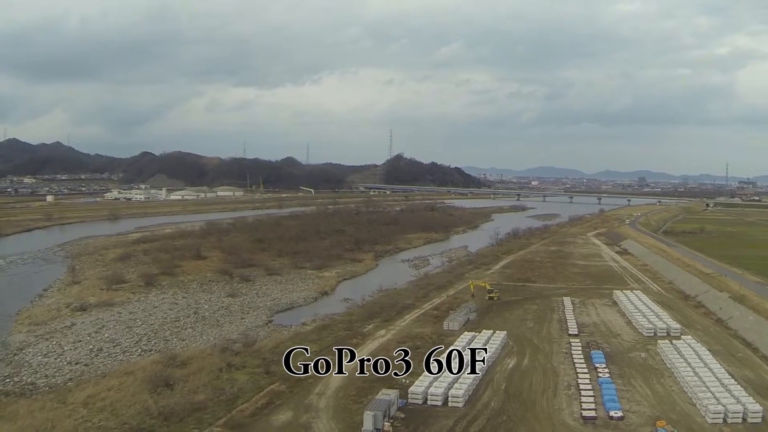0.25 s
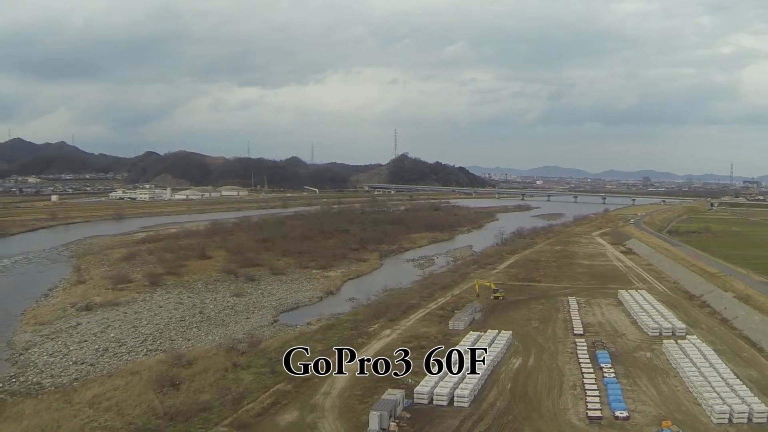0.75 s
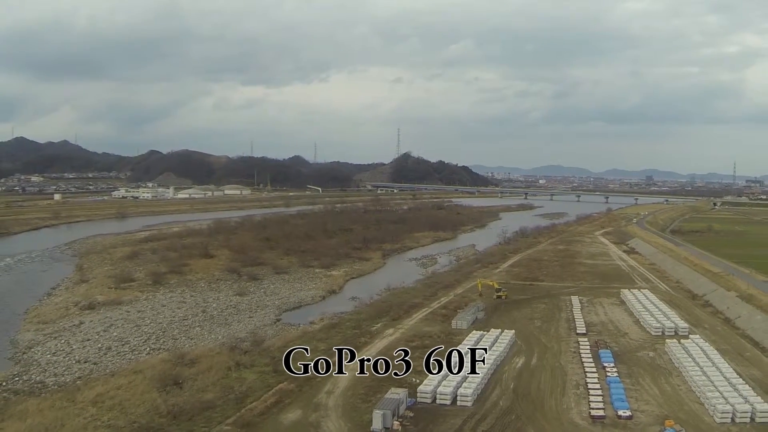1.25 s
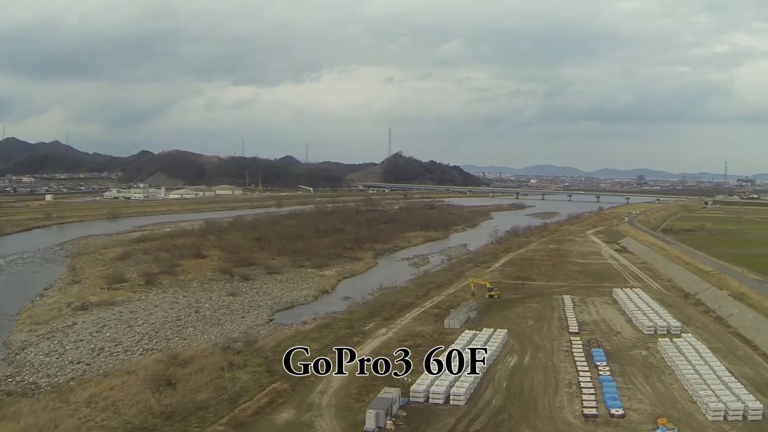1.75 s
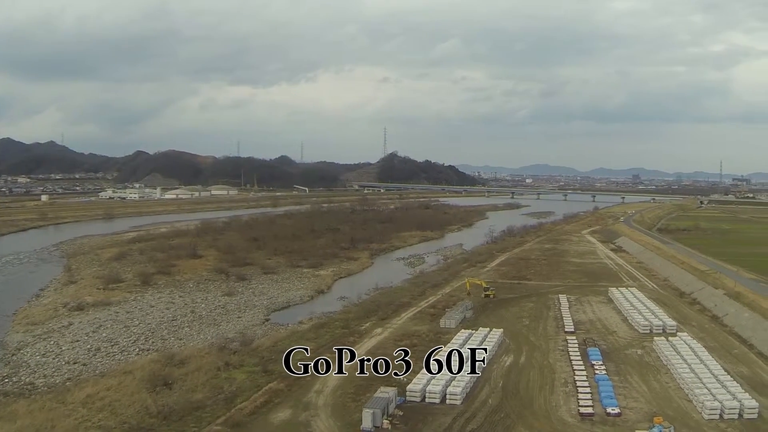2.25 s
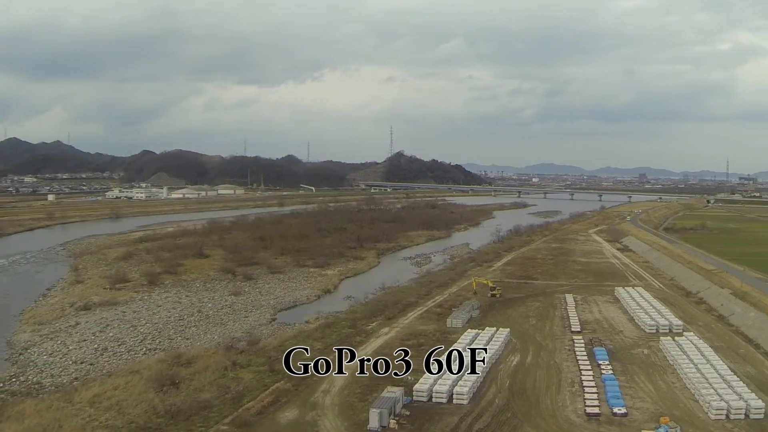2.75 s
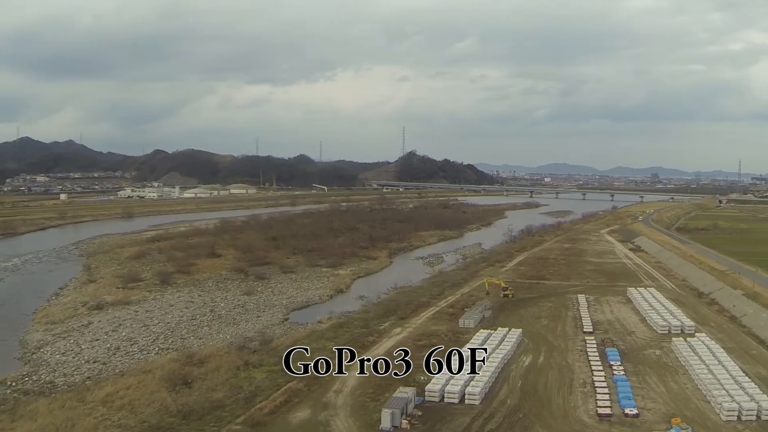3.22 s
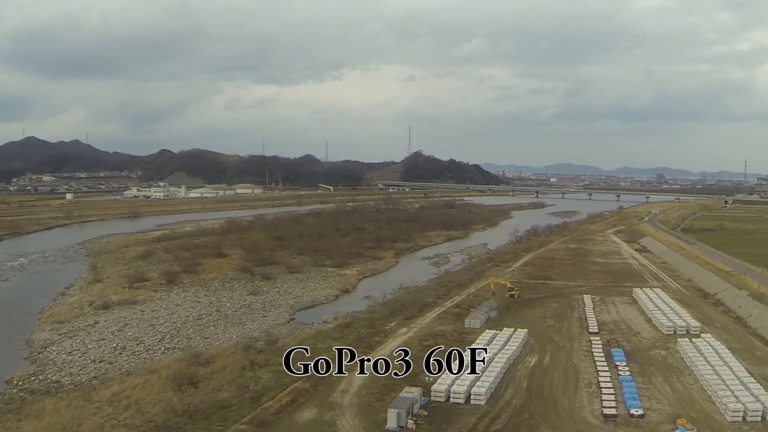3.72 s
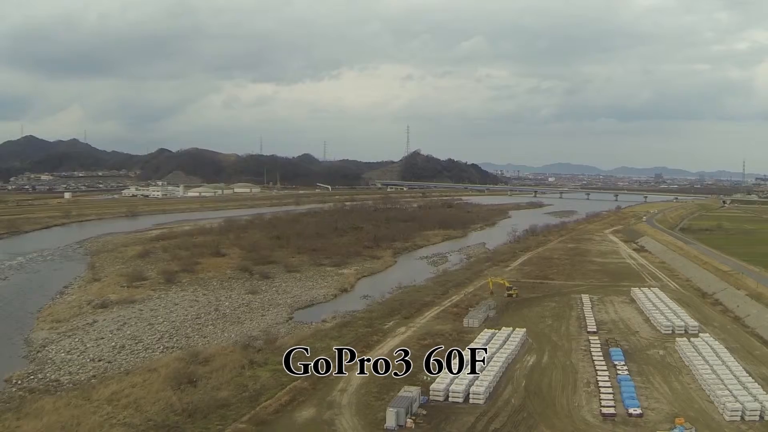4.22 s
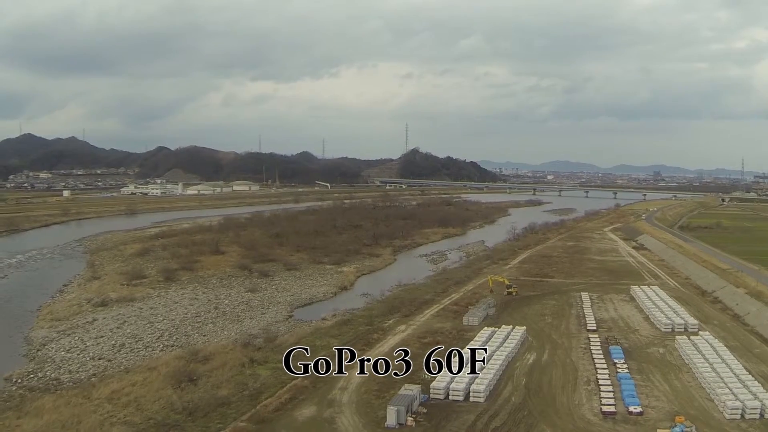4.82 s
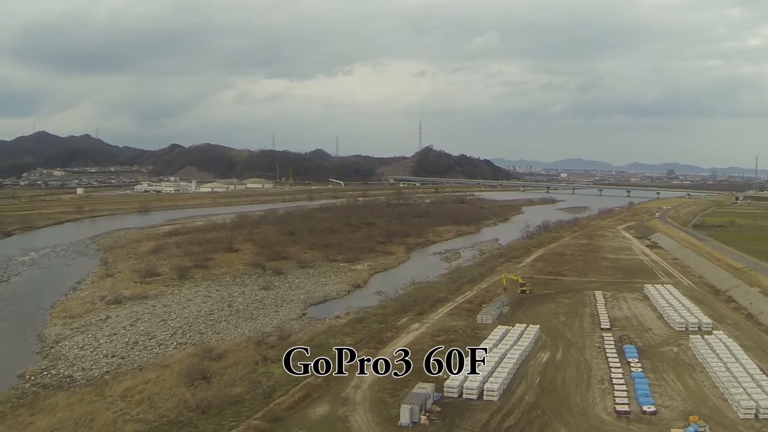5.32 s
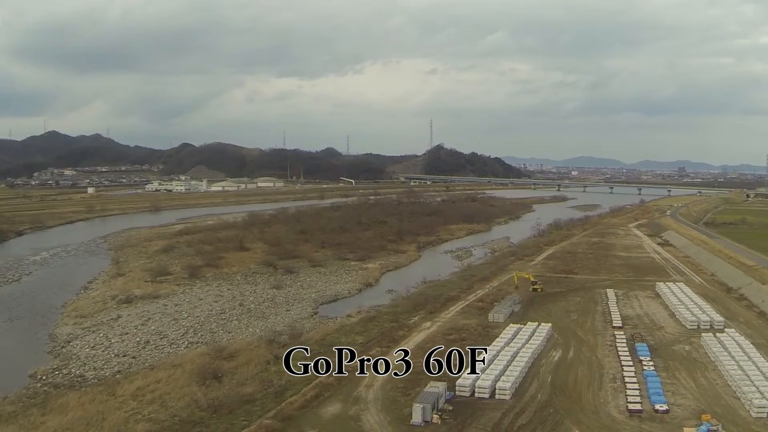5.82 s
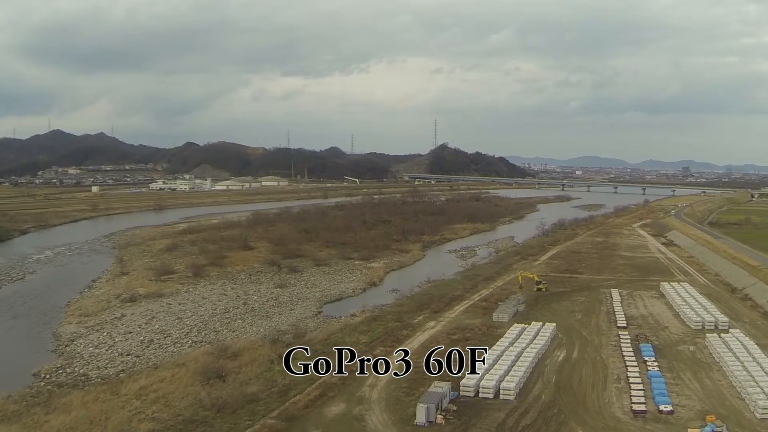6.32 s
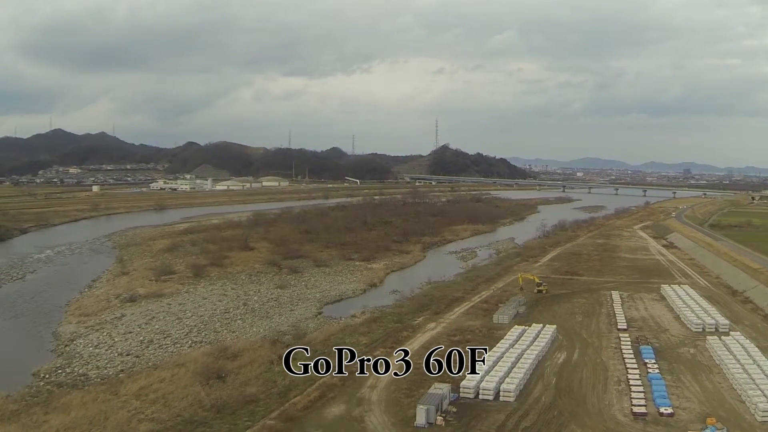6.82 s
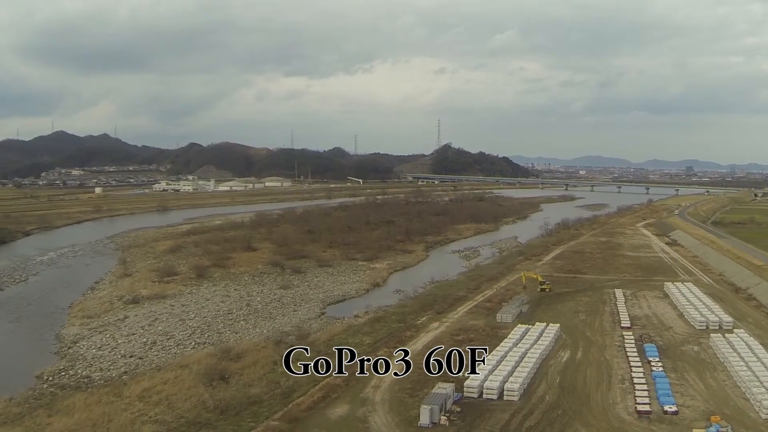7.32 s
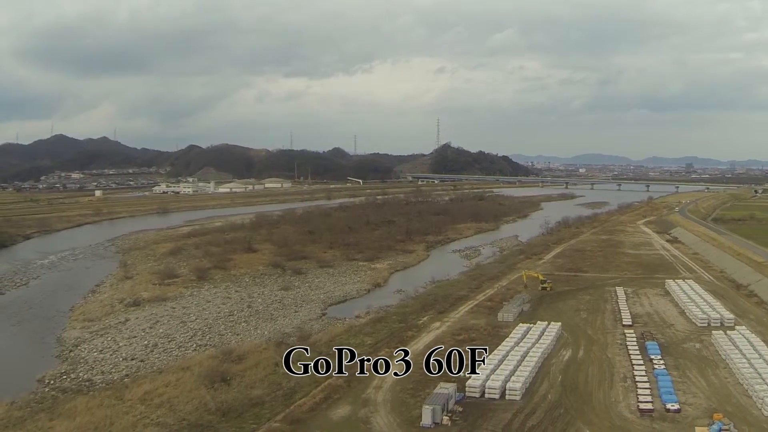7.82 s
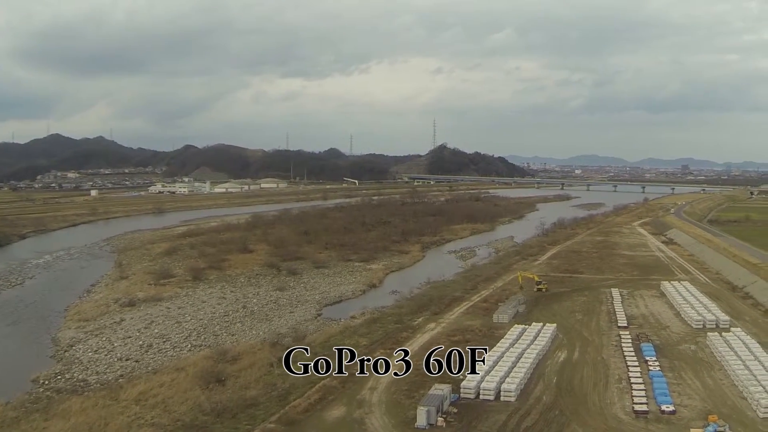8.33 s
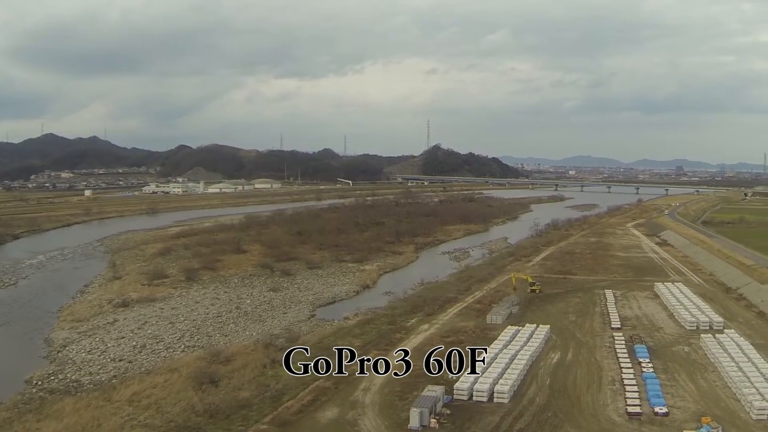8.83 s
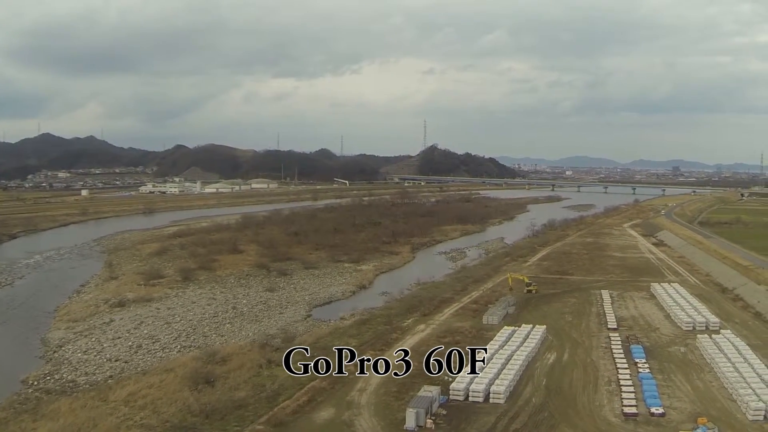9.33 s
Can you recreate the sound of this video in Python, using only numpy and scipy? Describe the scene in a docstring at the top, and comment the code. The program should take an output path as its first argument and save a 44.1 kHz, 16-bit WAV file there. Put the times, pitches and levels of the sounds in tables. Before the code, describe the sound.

Close on board a hovering multicopter above a riverside, several propellers give a continuous low buzzing hum that wavers and beats. Raspy air noise, fine hiss, a thin electric whine and a faint very high shimmer ride on top. Wind rumbles softly at first, then from about three seconds buffets the microphone with dull puffs and pops. A tiny rising squeak sounds near four seconds, and the level dips briefly several times afterwards.

```python
"""The propellers of a multicopter in flight, heard at a microphone on board, hum and beat against each other.
Each is a series of overtones of its blade rate; noise bursts at the blade passes give the rasp and hiss.
A motor whines at multiples of its blade rate, and close fixed tones near 8 kHz form the controllers' song.
Wind is coloured noise with chance gusts; from 3.4 s on, buffets add dull puffs and pointed spikes.
A short squeak rises at 3.9 s, and the level dips briefly several times from 4.9 s on."""
import sys
import numpy as np
from scipy import signal
from scipy.fft import rfft, irfft, next_fast_len
from scipy.io import wavfile

SR = 44100
rng = np.random.default_rng(int(sys.argv[2]) if len(sys.argv) > 2 else 0)


def generate_wav(sig):
    """Save sig (samples, or channels by samples) to the path in sys.argv[1] as 16-bit PCM at SR."""
    pcm = np.round(np.clip(np.atleast_2d(sig).T, -1, 1) * 32767).astype(np.int16)
    wavfile.write(sys.argv[1], SR, pcm)


N = 421596
TIME = np.arange(N) / SR

# Levels in the tables are relative: gains and scalings in the functions add to them.
# the two loudest propellers: (t/s, blade rate f/Hz, level of the fundamental/dB)
FAST_PROPELLER = [(0.0, 197.35, -19.0), (0.16, 188.02, -19.1), (0.52, 198.92, -19.5), (0.8, 188.38, -19.7),
                  (0.93, 192.35, -19.9), (2.43, 189.88, -19.4), (2.72, 181.63, -20.3), (3.39, 188.5, -19.8),
                  (3.74, 196.46, -20.4), (4.03, 191.23, -20.9), (4.19, 195.58, -20.7), (4.8, 194.08, -19.3),
                  (5.79, 201.07, -20.5), (7.32, 199.78, -21.0), (7.61, 201.6, -20.6), (8.61, 197.97, -21.5),
                  (9.28, 192.42, -20.0), (9.56, 197.44, -21.0)]
SLOW_PROPELLER = [(0.0, 180.84, -24.5), (0.19, 174.95, -24.7), (0.45, 181.79, -24.9), (0.86, 175.37, -24.2),
                  (1.19, 173.4, -23.5), (1.5, 180.95, -22.8), (2.21, 181.67, -21.1), (2.69, 176.23, -20.2),
                  (3.39, 171.7, -22.0), (4.92, 177.57, -25.7), (5.5, 169.83, -25.6), (6.31, 167.26, -24.5),
                  (7.11, 167.01, -24.3), (8.44, 171.89, -24.0), (9.56, 177.04, -22.5)]
# overtones of each propeller: (multiple of the blade rate, level/dB)
FAST_OVERTONES = [(1, 0), (2, -8.5), (3, -14.5), (4, -22.5), (5, -12), (6, -24.5), (8, -27), (12, -31)]
SLOW_OVERTONES = [(1, 0), (2, -9.5), (3, -29.5), (5, -40), (12, -33)]
# the fast propeller slaps its wake: (t/s, share of the wake 0-1, overtone brightening/dB per octave)
WAKE_SLAP = [(0, 0.94, -2.5), (.3, 0.75, -5), (.43, 1, 1.2), (.6, 0.73, 1), (.8, 1, -4.2),
             (1.45, 0.9, -3.9), (1.7, 0.85, -1.3), (2.3, 0.76, -1), (2.7, 0.6, -1.4), (3.15, 0, -1),
             (3.7, 0, -1.1), (4.5, 0, -0.6), (5.2, 0.7, -1.2), (6.8, 0.75, -4), (7.6, 0.63, -1),
             (8.6, 0.34, 0), (9.56, 0, 0)]
# the airframe favours some overtones as they glide through it: (f/Hz, level/dB)
AIRFRAME = [(200, 0.5), (355, -6), (385, 0.5), (500, 7), (548, 5.5), (580, 1), (650, 2), (730, -1),
            (780, 7), (850, -11.5), (1200, 0.5)]

# air torn by the blades: (t/s, rasp level/dB, treble level/dB)
WAKE_LEVELS = [(0.0, -24.5, 0), (1.25, -26, -1), (1.41, -30.5, 0), (1.6, -24, 3), (1.82, -28, 0.5),
               (3.11, -25.5, 3), (3.39, -31, -0.5), (3.77, -29, 0.5), (4.0, -33.5, -3.5), (4.58, -29, 1.5),
               (5.53, -31.5, 1), (5.61, -30, 0.5), (7.03, -32.5, -3), (7.45, -30, 1.7), (8.2, -32.5, -2.3),
               (8.8, -30.5, -0.3), (9.56, -33, -2)]
# spectra of the wake's rasp and of its fine hiss: (f/Hz, level/dB per Hz)
RASP_SPECTRUM = [(60, -20), (250, 2.5), (500, -0.5), (1000, 3.5), (2000, 2.5), (3000, -0.5), (4500, -4),
                 (5300, -12.5), (6000, -14.5), (8000, -13.5), (11000, -28.5)]
HISS_SPECTRUM = [(2000, -19), (5000, 13.5), (7000, 6.5), (9000, 7), (10500, 3), (13000, 0), (14300, -9),
                 (15300, -19)]
HISS_DB, FLICKER_DB = -36.5, 0.76  # hiss gain; rms depth of a random flicker shared by rasp and hiss

# third rotor, trimmed up and down, whose motor whines: (t/s, blade rate f/Hz)
WHINING_ROTOR_SPEED = [(0, 185.6), (.42, 183.5), (.56, 180.9), (.75, 180.1), (1.14, 180.8), (1.24, 183.2),
                       (1.46, 185), (1.6, 181), (2.3, 181.6), (2.58, 184.7), (2.85, 181.1), (3.12, 184.2),
                       (3.42, 177.8), (3.58, 182.3), (3.82, 182.2), (3.93, 184.5), (4.06, 181),
                       (4.17, 184.2), (4.5, 187), (5.02, 187.5), (5.57, 181.9), (6.4, 181.9), (6.53, 180.2),
                       (6.75, 181.1), (6.91, 178.3), (7.07, 181.8), (7.25, 180.1), (7.38, 180.4),
                       (7.46, 182.2), (7.54, 181), (7.63, 181.4), (7.72, 183.3), (7.97, 186), (8.2, 183.3),
                       (9.56, 186.2)]
# how hard the whining motor is driven: (t/s, level/dB)
MOTOR_DRIVE = [(0, -2), (.45, -5), (.55, -1.5), (1.2, -.5), (1.55, -8), (2.5, -6), (2.8, -0.5), (4.3, 1),
               (6, -0.5), (7.6, 0.5), (7.8, -1), (9.56, 0)]
# the whine swells as it glides through this resonance of the motor mount
MOUNT_HZ, MOUNT_WIDTH_HZ, WHINE_DB = 5066, 52.6, -32
STUMBLE_S, STUMBLE_DB = .11, -16  # the motor stumbles from the squeak on: length, change of its whine
# switching tones of the speed controllers, each on its own clock: (f/Hz, level/dB)
SWITCHING_TONES = [(8028.5, -44), (8045.72, -40.5), (8048.97, -36.3), (8086.25, -34.2), (8088.9, -46)]
# their sidebands, two from the whining motor, then three from the fast one: (level/dB)
SIDEBAND_LEVELS = [-53, -53.5, -57, -57, -66]
SINGING_DB, SWELL_S = -1.5, 2.06  # common gain of the tones; moment of one swell of their slow beat

# strength of the wind on the microphone: (t/s, level/dB)
WIND_STRENGTH = [(0.0, -26.5), (.6, -27.5), (1.2, -28), (1.86, -22), (2.22, -27), (2.7, -25), (3.2, -21.5),
                 (3.75, -21), (4.2, -19), (4.7, -21.5), (5.05, -13.5), (5.95, -20.5), (6.5, -18.5),
                 (6.85, -19), (7.3, -21), (8.15, -16.5), (8.6, -21), (9.56, -21.5)]
# spectra of the rumble and of the flutter: (f/Hz, level/dB per Hz)
RUMBLE_SPECTRUM = [(8, -10.5), (25, -2.5), (50, 0.5), (85, -1), (130, -7), (200, -7.5), (350, -36.5),
                   (900, -72)]
FLUTTER_SPECTRUM = [(40, -12), (130, 2), (260, 0), (450, -4.5), (750, -8), (1300, -17.5), (2500, -35),
                    (6000, -62)]
# slow heaving of the air around the craft: (f/Hz, level/dB per Hz)
HEAVE_SPECTRUM = [(8, 7), (30, -2), (48, -2), (80, -14), (200, -39)]
GUST_DB, GUST_HZ = 1.33, 4.1  # rms depth and fastest rate of the quick gusts
RUMBLE_DB, FLUTTER_DB = 1, -6  # against the wind's strength
HEAVE_DB = -30
KNOCKS_FROM_DB, KNOCKS_SPAN_DB = -24.5, 3.5  # wind at the first knocks; further rise to the densest

# single buffets of wind: (start t/s, level/dB)
WIND_BUFFETS = [(3.358, -17), (3.453, -10.5), (4.133, -11), (4.291, -12), (4.554, -15), (4.87, -16.5),
                (5.052, -11), (5.14, -12.5), (5.346, -19), (5.388, -12.5), (5.49, -12.5), (5.896, -9.5),
                (5.985, -11.5), (6.079, -17.5), (6.753, -9.5), (6.785, -11), (6.865, -13), (6.916, -11),
                (7.982, -15), (8.032, -10.5), (8.074, -12.5), (8.331, -9.5), (8.437, -11.5), (9.399, -9.5),
                (9.438, -13.5), (9.484, -16)]
# spectrum of their puffs: (f/Hz, level/dB per Hz)
PUFF_SPECTRUM = [(30, -14), (100, 6.5), (400, 2), (700, -2.5), (1200, -10), (2200, -28), (5000, -49)]
BUFFET_RISE_S = .0025  # time in which each puff swells
# one short rising squeak: (t/s, length/s, start f/Hz, end f/Hz, level/dB)
RISING_SQUEAK = (3.905, .027, 3680, 4430, -32)
# brief dips of the level: (t/s, depth/dB, recovery time constant/s)
LEVEL_DIPS = [(4.885, 7, 0.23), (5.13, 6, 0.086), (5.398, 5.5, 0.099), (5.5, 3.5, 0.06), (6.31, 2, 0.055),
              (6.4, 6.5, 0.032), (6.795, 5.5, 0.13), (7.69, 6, 0.078), (8.0, 2, 0.18), (8.25, 5, 0.018),
              (8.956, 9, 0.071)]
EDGE_HZ = 15270  # upper band limit


def gain_of(db):
    """Logarithmic level: twenty decibels are a tenfold amplitude."""
    return 10 ** (np.asarray(db) / 20)


def evened(x):
    """Normalisation of power: scales a signal to an rms of one."""
    return x / np.sqrt(np.mean(x ** 2) + 1e-20)


def follow(rows):
    """Linear interpolation: every column of a curve table, sample by sample."""
    t, *columns = np.transpose(rows)
    return [np.interp(TIME, t, column) for column in columns]


def read(points, hz):
    """Logarithmic pitch scale: a spectrum is interpolated over log frequency."""
    f, db = np.transpose(points)
    return np.interp(np.log(hz + 1e-6), np.log(f), db)


def colour(x, points):
    """Linear filtering: each frequency is weighted by the response of a table."""
    size = next_fast_len(N)
    response = gain_of(read(points, np.fft.rfftfreq(size, 1 / SR)))
    return irfft(rfft(x, size) * response, size)[:N]


def noise(points):
    """Filtered white noise: steady coloured noise with an rms of one."""
    return evened(colour(rng.standard_normal(N), points))


def wander(rate_hz):
    """Low-passed chance: a smooth random curve, rms one, changing up to about rate_hz times a second."""
    size = next_fast_len(N)
    hz = np.fft.rfftfreq(size, 1 / SR)
    spectrum = rfft(rng.standard_normal(size)) / (1 + (hz / rate_hz) ** 4)
    return evened(irfft(spectrum, size)[:N])


def angle_of(hz):
    """Phase as the time integral of frequency, in radians."""
    return 2 * np.pi * np.cumsum(hz) / SR


def tone(angle, db):
    """Harmonic oscillation: a sinusoid at an rms level."""
    return np.sqrt(2) * gain_of(db) * np.cos(angle)


def add(mix, s, sound):
    """Superposition: adds a sound into a mix at a time."""
    part = mix[round(s * SR):][:len(sound)]
    part += sound[:len(part)]


def propeller(angle, db, overtones, bite_db, jitter, flicker_db):
    """Blade-passing tone: each blade leaves a dip of pressure, sharper as it bites.
    Uneven air shakes its timing and its overtones."""
    shaken = angle + jitter * wander(rate_hz=31)
    upper = sum(tone(k * shaken, read(overtones, k) + bite_db * np.log2(k)) for k in np.arange(2, 13))
    flicker = gain_of(flicker_db * wander(rate_hz=10))
    return -gain_of(db) * (tone(shaken, 0) + upper * flicker)


def chop(angle, sharpness):
    """Periodic modulation: a power envelope with one burst at every blade pass, mean one."""
    burst = np.exp(sharpness * np.cos(angle))
    return burst / burst.mean()


def wake(fast, slow):
    """Vortex noise: turbulence leaves the blades in bursts of uneven size, over a smoother hiss."""
    rasp_db, treble_db = follow(WAKE_LEVELS)
    slap = follow(WAKE_SLAP)[0]
    bursts = slap * chop(fast, sharpness=1.34) + (1 - slap) * chop(slow, sharpness=0.52)
    # the root turns power into amplitude
    swirl = evened(np.sqrt(bursts) * gain_of(1.9 * wander(rate_hz=150)))
    rasp = noise(RASP_SPECTRUM) * swirl * gain_of(rasp_db + 1.62)
    hiss = noise(HISS_SPECTRUM) * swirl ** 0.71 * gain_of(HISS_DB + treble_db)
    return (rasp + hiss) * gain_of(FLICKER_DB * wander(rate_hz=8.7))


def mount_db(hz):
    """Resonance: response of the motor mount to a tone, zero decibels at its peak."""
    return -10 * np.log10(1 + (2 * (hz - MOUNT_HZ) / MOUNT_WIDTH_HZ) ** 2)


def whine_db():
    """Forced vibration: the whine follows the motor's drive and drops out while it stumbles."""
    centre_s = RISING_SQUEAK[0] + STUMBLE_S / 2
    stumble = np.exp(-((TIME - centre_s) / (STUMBLE_S / 2)) ** 4)
    return WHINE_DB + follow(MOTOR_DRIVE)[0] + STUMBLE_DB * stumble + 1.6 * wander(rate_hz=6.2)


def motor(fast):
    """Magnetic forces: poles whine at multiples of the blade rate and modulate the switching tones."""
    unsteady = 1 + .0005 * wander(rate_hz=30) + .0011 * wander(rate_hz=8)
    hz = follow(WHINING_ROTOR_SPEED)[0] * unsteady
    blade = angle_of(hz)
    poles = 7 * blade
    ring_db = mount_db(4 * 7 * hz)
    whine = tone(4 * poles, whine_db() + ring_db)
    # a softer companion tone falls as the whine rises, and swells with it
    falling = 2 * np.pi * 7410 * TIME - 2 * poles
    companion = tone(falling, -44 + 0.25 * ring_db + 2.5 * wander(rate_hz=7))
    shake = 0.72 * wander(rate_hz=45)
    lower = np.cos(3 * poles + shake) * gain_of(-44.5 + 2.4 * wander(rate_hz=12))
    first, second = (2 * np.pi * f * TIME for f, _ in SWITCHING_TONES[2:4])
    angles = [first + poles, second - poles + shake,
              second + 7 * fast, second + 2 * fast, second + 3 * fast]
    sidebands = sum(tone(angle, db) for angle, db in zip(angles, SIDEBAND_LEVELS))
    rotor_hum = tone(blade, -43.5) + tone(2 * blade, -38.0)
    return whine + companion + lower + sidebands + rotor_hum


def controllers(treble_share=0.41):
    """Beats: five close switching tones make a fast shimmer that throbs about three times a second."""
    tones = np.zeros(N)
    for hz, db in SWITCHING_TONES:
        angle = 2 * np.pi * hz * (TIME - SWELL_S) + 0.48 * wander(rate_hz=8.7)
        tones += tone(angle, db + 0.5 * wander(rate_hz=3.8))
    return tones * gain_of(SINGING_DB + treble_share * follow(WAKE_LEVELS)[1])


def cusp(width_s):
    """Eddy pressure: a passing eddy gives a pointed spike with shallow shoulders of the other sign."""
    away = abs(np.arange(-SR // 100, SR // 100) / SR) / width_s
    return 2 * np.exp(-away) - np.exp(-away / 2)


def wind(knocks_per_s=22, knock_db=5):
    """Turbulent pressure: a lumpy rumble and quicker flutter, with small knocks when it blows hard."""
    wind_db = follow(WIND_STRENGTH)[0] + GUST_DB * wander(rate_hz=GUST_HZ)
    rumble_lumps = evened(gain_of(1.83 * wander(rate_hz=12.7)))
    rumble = noise(RUMBLE_SPECTRUM) * gain_of(wind_db + RUMBLE_DB) * rumble_lumps
    flutter_lumps = evened(gain_of(3.3 * wander(rate_hz=33)))
    flutter = noise(FLUTTER_SPECTRUM) * gain_of(wind_db + FLUTTER_DB) * flutter_lumps
    blowing = np.clip((wind_db - KNOCKS_FROM_DB) / KNOCKS_SPAN_DB, 0, 1)
    eddies = (rng.random(N) < blowing * knocks_per_s / SR) * rng.uniform(-1, 1, N)
    knocks = signal.oaconvolve(eddies, cusp(width_s=0.00086), "same") * gain_of(wind_db + knock_db)
    heave = noise(HEAVE_SPECTRUM) * gain_of(HEAVE_DB)
    return rumble + flutter + knocks + heave


def buffets(puff_db=-.5, spike_db=3, lag_s=0.002):
    """Impulsive pressure: strong eddies give the microphone port a suction spike inside a dull puff."""
    push, spikes = np.zeros(N), np.zeros(N)
    age = TIME[:SR // 10] / BUFFET_RISE_S
    swell = age * np.exp(1 - age)
    for s, db in WIND_BUFFETS:
        add(push, s, gain_of(db + puff_db) * swell)
        add(spikes, s + lag_s, [-gain_of(db + spike_db)])
    puffs = noise(PUFF_SPECTRUM) * push
    return puffs + signal.oaconvolve(spikes, cusp(width_s=0.0007), "same")


def squeak():
    """Frequency glide: a brief sinusoid rises steadily in frequency."""
    s, length_s, start_hz, end_hz, db = RISING_SQUEAK
    hz = np.linspace(start_hz, end_hz, int(length_s * SR))
    out = np.zeros(N)
    add(out, s, tone(angle_of(hz), db) * signal.windows.tukey(len(hz), .5))
    return out


def dips(fall_s=0.0056):
    """Exponential attenuation: the gain drops quickly and creeps back."""
    drop_db = np.zeros(N)
    for s, depth_db, recovery_s in LEVEL_DIPS:
        before, after = np.maximum(s - TIME, 0), np.maximum(TIME - s, 0)
        drop_db += depth_db * np.exp(-after / recovery_s - before / fall_s)
    return gain_of(-drop_db)


def scene():
    """Superposition: propellers, motors and wind add at one microphone; the dips spare the buffets."""
    fast_hz, fast_db = follow(FAST_PROPELLER)
    slow_hz, slow_db = follow(SLOW_PROPELLER)
    slap, brightening_db = follow(WAKE_SLAP)
    fast = angle_of(fast_hz)
    slow = angle_of(slow_hz) + np.pi  # their blades start half a pass apart
    hum = propeller(fast, fast_db + 0.22, FAST_OVERTONES, bite_db=brightening_db,
                    jitter=0.05 + 0.05 * slap, flicker_db=1.5)
    hum += propeller(slow, slow_db + 0.087, SLOW_OVERTONES, bite_db=1.1, jitter=0.074, flicker_db=3.5)
    craft = colour(hum, AIRFRAME) + wake(fast, slow) + motor(fast) + controllers()
    air = craft + wind() + squeak()
    return (air * dips() + buffets())[None]


def record(dry):
    """Saturation, then band limiting: the highest peaks are rounded off and the top treble is cut."""
    rounded = dry / (1 + dry ** 6) ** (1 / 6)
    low_pass = signal.firwin(1023, EDGE_HZ, window=("kaiser", 9), fs=SR)
    return signal.oaconvolve(rounded, low_pass[None], "same")


dry = scene()
out = record(dry)
generate_wav(out)
```